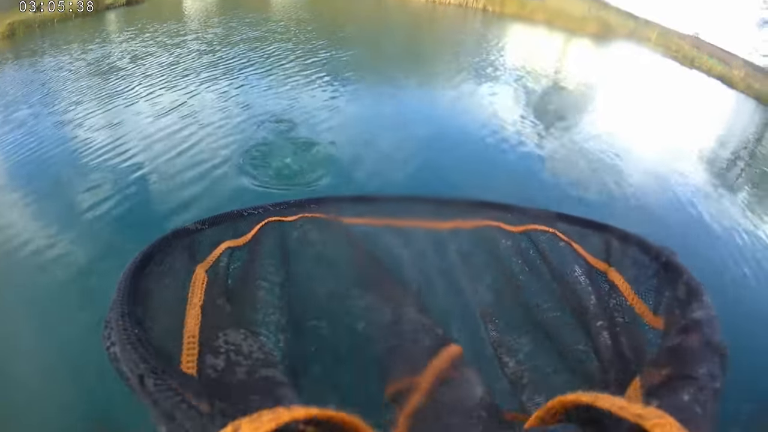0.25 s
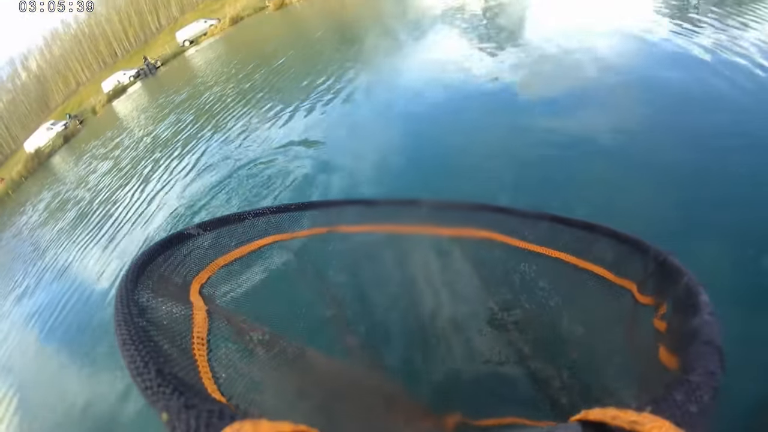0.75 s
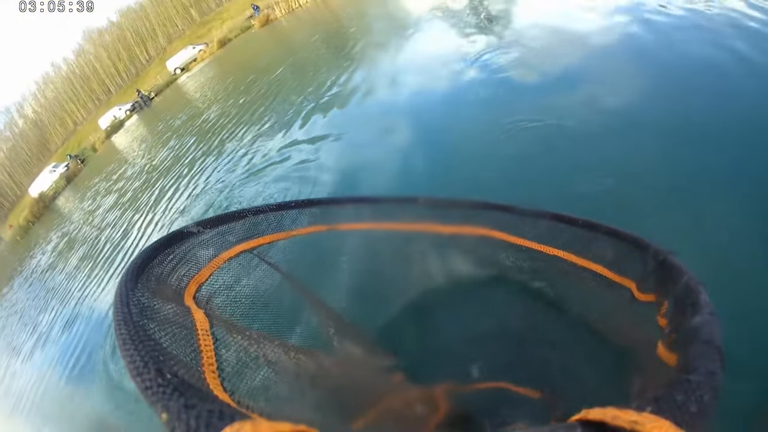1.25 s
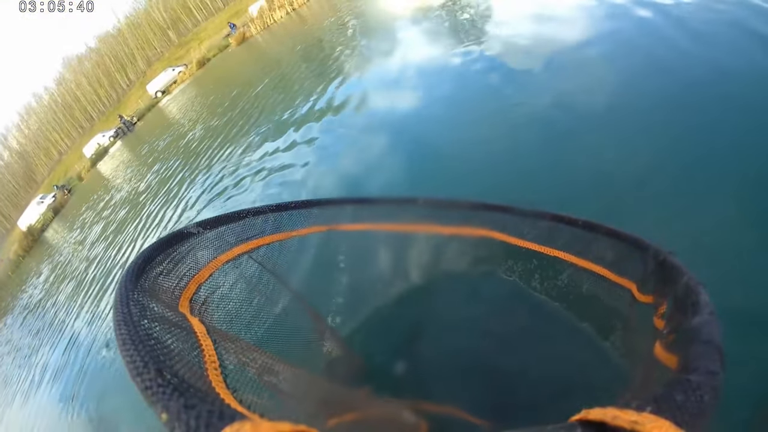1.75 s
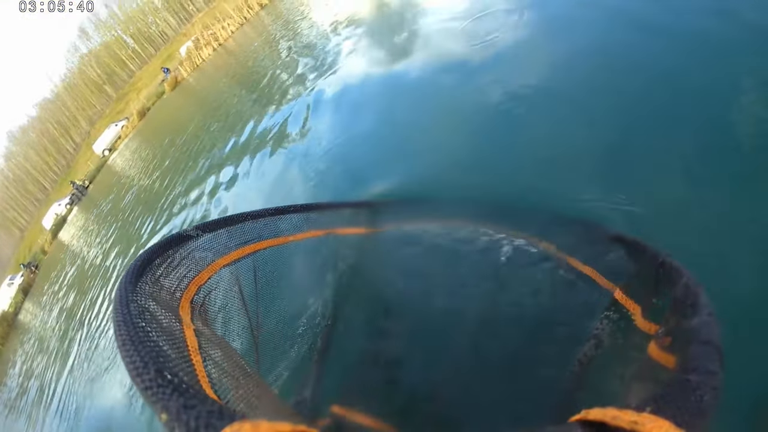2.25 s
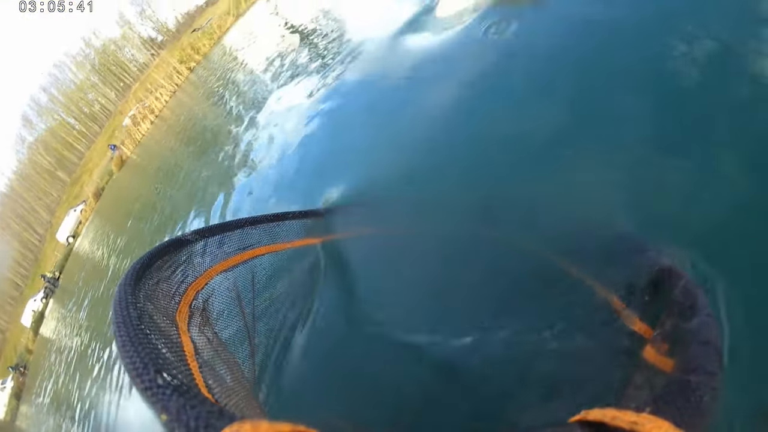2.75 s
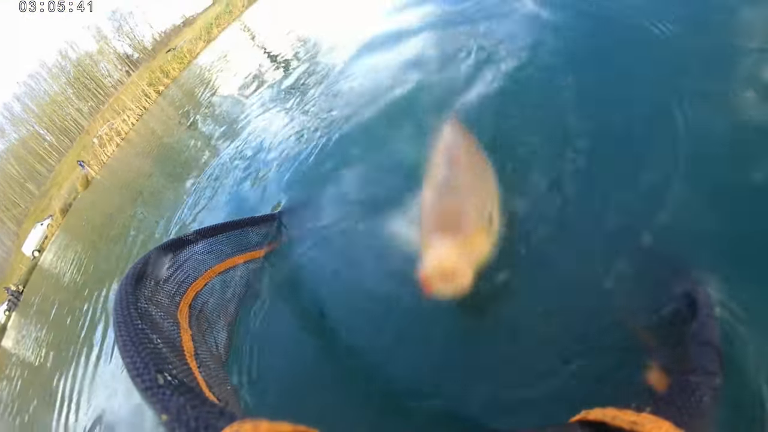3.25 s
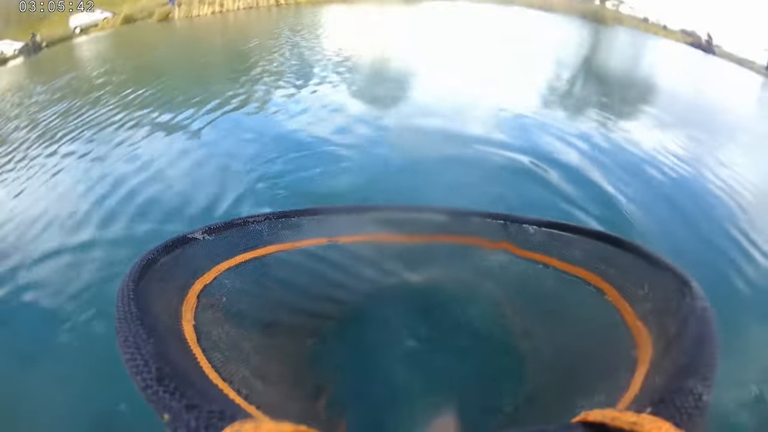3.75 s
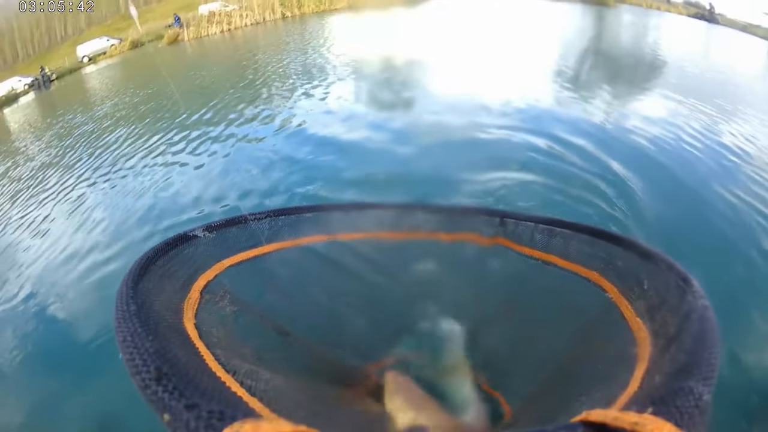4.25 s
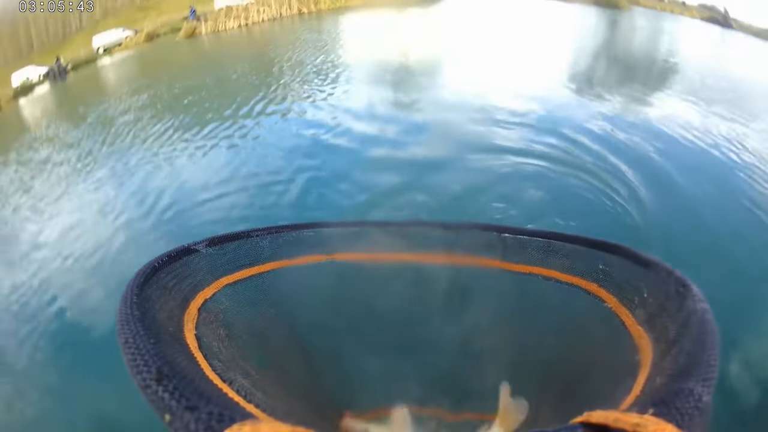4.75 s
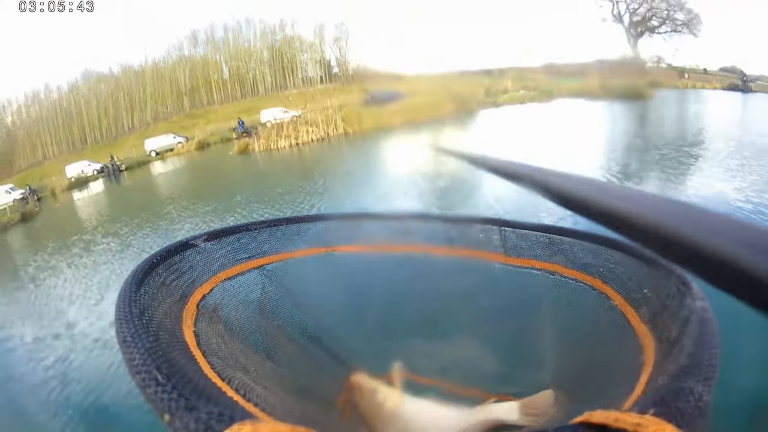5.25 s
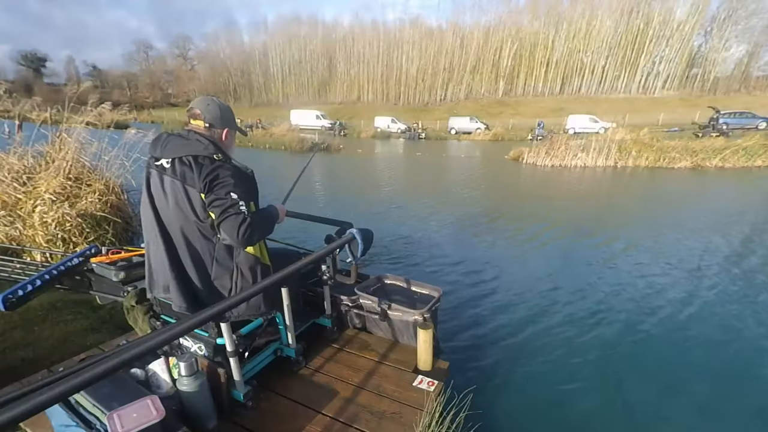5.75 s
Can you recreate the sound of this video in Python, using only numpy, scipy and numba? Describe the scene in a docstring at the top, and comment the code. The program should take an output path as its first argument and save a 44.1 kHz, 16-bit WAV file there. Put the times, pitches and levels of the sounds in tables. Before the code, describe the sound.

A landing-net pole hums and knocks amid gurgling water and wind rumble, heard on the left, before switching to stereo lakeside hiss.

```python
"""A landing-net pole hums as it bends, heard on the left only through the case of a camera strapped to it.
Mesh and hands scrape the pole, the loose frame knocks, and water and wind push on the case. Water
gurgles and drips, and the loudest moments overload the input. Near the end the sound switches to a
stereo camera on the bank: a soft fading ring, wind rumble, lakeside hiss and a few tackle clicks."""
import sys
import numpy as np
from scipy import signal
from scipy.fft import rfft, irfft
from scipy.io import wavfile
from scipy.ndimage import uniform_filter1d
from numba import njit

SR = 44100
rng = np.random.default_rng(int(sys.argv[2]) if len(sys.argv) > 2 else 0)


def unload_wav(signal):
    """Save mono or channel-first audio to the path in sys.argv[1] as 16-bit WAV at rate SR, clipped to [-1, 1]."""
    wavfile.write(
        sys.argv[1],
        SR,
        np.round(np.clip(np.atleast_2d(signal).T, -1, 1) * 32767).astype(np.int16),
    )


N = 264600
T = np.arange(N) / SR

# steady rubbing and sloshing: time_s, ring_db, wash_db, bright_db, gurgle_db
RUB_AND_SLOSH = [(0.0, -74, -57.5, -72.5, -70), (0.145, -64, -54.5, -66.5, -50),
                 (0.18, -30.5, -52, -75, -44.5), (0.29, -29, -63, -52, -28.5), (0.38, -35, -31, -50, -29),
                 (0.53, -16.5, -33, -42, -25.5), (0.59, -30, -53, -51.5, -34.5),
                 (0.66, -34.5, -72, -67, -36), (0.72, -45, -74, -70.5, -46), (0.75, -72, -74, -87, -79),
                 (0.79, -61.5, -60, -71.5, -63), (1.08, -50, -74.5, -73, -81),
                 (1.4, -69.5, -66, -68.5, -68), (1.61, -42, -73, -76.5, -57.5),
                 (1.75, -46, -55.5, -79.5, -60), (1.86, -58.5, -63, -77.5, -66),
                 (1.93, -88.5, -80.5, -93, -80), (2.11, -87.5, -85, -94.5, -101),
                 (2.16, -76, -71.5, -85.5, -89), (2.55, -84, -72, -87.5, -88),
                 (2.85, -77, -69.5, -83.5, -88), (3.1, -83, -72.5, -83.5, -88.5),
                 (3.5, -71.5, -65.5, -80, -96), (3.95, -75.5, -73, -95.5, -95),
                 (4.1, -62, -63, -66.5, -58.5), (4.23, -59, -52.5, -60.5, -52.5),
                 (4.45, -63, -44, -58.5, -39.5), (4.55, -64, -50, -67, -48.5), (4.73, -69, -46, -59, -41.5),
                 (4.85, -77, -50.5, -55, -47), (5.07, -46, -43, -52.5, -45.5), (5.16, -65, -62, -66, -60),
                 (5.3, -44.5, -43.5, -57.5, -47), (5.36, -53, -56, -76, -73), (5.49, -60, -49, -51, -49)]
# short scuffs and glugs: start_s, length_s, ring_db, gurgle_db
SCUFFS_AND_GLUGS = [(0.249, 0.025, -27.5, -56), (1.054, 0.022, -65, -53), (1.127, 0.033, -48, -52),
                    (3.109, 0.034, -76.5, -48.5), (3.174, 0.02, -59, -51.5), (3.488, 0.013, -71, -71),
                    (4.057, 0.018, -75, -49), (4.165, 0.031, -35, -31), (4.228, .06, -62, -42.5),
                    (4.385, 0.039, -50, -41), (4.456, 0.018, -55, -32), (4.529, 0.0063, -49, -42),
                    (4.554, 0.0087, -53, -57), (4.721, 0.02, -63, -51), (4.754, 0.036, -67, -35),
                    (4.972, 0.033, -60, -24), (5.093, 0.034, -29.5, -50), (5.214, 0.018, -22, -30),
                    (5.294, 0.025, -47, -37), (5.376, 0.034, -60, -45.5), (5.472, 0.016, -27.5, -45)]


def undb(db):
    """Turn decibels into a gain."""
    return 10 ** (np.asarray(db) / 20)


def unit(x):
    """Scale to an average (rms) level of 1."""
    return x / np.sqrt(np.mean(x ** 2))


def curves(table):
    """Join each column's points with straight lines in time."""
    time_s, *columns = np.transpose(table)
    return [np.interp(T, time_s, column) for column in columns]


def ring(x, hz, width_hz):
    """One resonance: keeps the sound near hz."""
    return signal.lfilter(*signal.iirpeak(hz, hz / width_hz, fs=SR), x)


def body(x, modes):
    """Add up several resonances, flipping every other one."""
    return sum((-1) ** k * undb(db) * ring(x, hz, width) for k, (hz, width, db) in enumerate(modes))


@njit
def moving_ring(x, hz, width_hz):
    """A resonance whose pitch can move every sample."""
    y, band, low = np.empty(len(x)), 0., 0.
    for i in range(len(x)):
        tuning, damping = np.tan(np.pi * hz[i] / SR), width_hz / hz[i]
        swing = (band + tuning * (x[i] - low)) / (1 + tuning * (tuning + damping))
        band, low = 2 * swing - band, low + 2 * tuning * swing
        y[i] = damping * swing
    return y


def muffle(x, hz):
    """Turn down the treble above hz."""
    return signal.sosfilt(signal.butter(3, hz, fs=SR, output="sos"), x)


def coloured(spectrum):
    """Noise of level 1, shaped by rows of pitch_hz, level_db."""
    hz, db = np.transpose(spectrum)
    log_hz = np.log(np.fft.rfftfreq(N, 1 / SR) + 1)
    gain = undb(np.interp(log_hz, np.log(hz), db, left=-90, right=-90))
    return unit(irfft(rfft(rng.standard_normal(N)) * gain, N))


def wander(per_s):
    """A smooth random wobble of size about 1."""
    hold = int(SR / per_s)
    steps = np.repeat(rng.standard_normal(N // hold + 1), hold)
    return unit(uniform_filter1d(uniform_filter1d(steps, hold), hold)[:N])


def burst(start_s, length_s, rise_s=0.0027):
    """A level that rises quickly, holds briefly and ends fast."""
    age = np.clip(T - start_s, 0, 1)
    return (1 - np.exp(-age / rise_s)) * np.exp(-(age / length_s) ** 2)


def pole_hum(tone_share=0.76, bump_s=.02):
    """The bending pole hums and shudders; soft bumps set it swinging briefly."""
    # the hum: time_s, pitch_hz, level_db
    bending = [(0.0, 57.24, -49), (0.14, 59.18, -45), (0.152, 62.74, -17), (0.3, 69.3, -26),
               (0.52, 80.1, -19.5), (0.61, 74.24, -29), (0.8, 46.47, -40.5), (1.23, 47.33, -34.5),
               (1.5, 45.92, -44), (1.71, 78.85, -32.5), (1.8, 79.86, -37), (1.92, 65.3, -55.5),
               (2.1, 62.4, -61.5), (2.5, 49.14, -50.5), (3.0, 44.47, -46), (3.6, 60, -46), (4.0, 46, -46),
               (4.12, 48, -24), (4.21, 60.1, -21), (4.44, 69.7, -23), (4.58, 59.51, -26), (4.75, 62, -28),
               (4.9, 49.03, -27.5), (5.19, 63.48, -24), (5.25, 62.6, -36.5), (5.29, 65.9, -26.5),
               (5.35, 68.7, -30), (5.5, 72.3, -39)]
    # soft bumps: middle_s, level_db, pitch_hz
    bumps = [(0.07, -28.5, 35), (2.191, -29, 55), (2.324, -30.5, 45), (2.42, -39, 50), (2.689, -31.5, 48),
             (3.14, -31.5, 53), (3.481, -32, 45), (3.8, -32.5, 60), (3.875, -28.5, 53), (3.98, -32, 40),
             (4.06, -20, 42), (4.521, -21.5, 50)]
    hz, db = curves(bending)
    phase = 2 * np.pi * np.cumsum(hz * (1 + 0.0498 * wander(25))) / SR
    octave = .12 * (hz / 70) ** 3.9 * np.sin(2 * phase)  # stronger as the pitch rises
    tone = undb(1.5 * wander(23)) * np.sqrt(2) * (np.sin(phase) + octave)
    shudder = coloured([(35, -11.5), (50, -8), (85, 2), (115, -29.5)])
    hum = undb(db + 2.5 * wander(12)) * (np.sqrt(tone_share) * tone + np.sqrt(1 - tone_share) * shudder)
    for middle_s, level_db, pitch_hz in bumps:
        swell = np.exp(-2 * ((T - middle_s) / bump_s) ** 2)
        hum += undb(level_db) * swell * np.sin(2 * np.pi * pitch_hz * (T - middle_s))
    return hum


def case_rumble():
    """Water and wind push on the case in gusts and single slow lurches."""
    # strength of the push: time_s, deep_db, upper_db
    pushes = [(0.0, -52, -56), (0.14, -38, -51), (0.155, -31, -21.5), (0.44, -65, -49), (0.64, -60, -34),
              (0.72, -32, -41.5), (0.82, -42.5, -54), (1.1, -43.5, -42.5), (1.35, -34, -60.5),
              (1.62, -50, -44), (1.82, -43.5, -43), (1.96, -47, -72.5), (2.95, -42, -68.5),
              (3.2, -42, -62.5), (4.0, -40.5, -63.5), (4.06, -29, -36.5), (4.25, -39.5, -33),
              (4.6, -26.5, -39.5), (4.9, -34.5, -36.5), (5.22, -27.5, -48.5), (5.5, -33.5, -40)]
    # lurches of pressure on the microphone: middle_s, length_s, signed_size
    lurches = [(0.722, 0.019, 0.13), (0.752, 0.05, -0.13), (0.785, 0.055, 0.1), (5.154, 0.033, 0.19),
               (5.167, 0.04, -0.083), (5.248, 0.061, -0.23), (5.278, .04, 0.0033)]
    deep_db, upper_db = curves(pushes)
    deep = coloured([(8, -14.5), (22, 1.5), (42, -3.5), (60, -21.5)])
    upper = coloured([(90, 4.5), (115, -0.5), (200, -7.0), (300, -18)])
    lurch = sum(size * np.exp(-.5 * ((T - s) / (0.3 * length)) ** 2) for s, length, size in lurches)
    return undb(deep_db + 3.0 * wander(12)) * deep + undb(upper_db + 2.9 * wander(30)) * upper + lurch


def scraped_pole(slips, rattle):
    """Tiny slips of mesh and hands make the pole and case ring, as do the frame's knocks."""
    # low resonances of pole and case: pitch_hz, width_hz, level_db
    low_modes = [(370, 35, -11), (522, 30, 0), (608, 25, -10), (750, 120, -17), (912, 30, -3),
                 (1135, 35, -8)]
    # high resonances: pitch_hz, width_hz, level_db
    high_modes = [(1817, 90, 7), (2170, 140, 3), (2460, 380, -0.5), (3235, 400, 2), (4760, 1200, -8)]
    ring_db, _, bright_db, _ = curves(RUB_AND_SLOSH)
    scuffs = sum(undb(db) * burst(s, length) for s, length, db, _ in SCUFFS_AND_GLUGS)
    low_rub = slips * (undb(ring_db) + scuffs)
    high_rub = rng.standard_normal(N) * undb(bright_db + 0.5 * wander(58) + 1.1 * wander(7.2))
    dull, bright, hard = frame_knocks(rattle)
    # dividing keeps plain noise at the same level through the resonances
    low = body(low_rub + dull, low_modes) / np.std(body(rattle[:SR], low_modes))
    high = body(high_rub + bright, high_modes) / np.std(body(rattle[:SR], high_modes))
    thud = 2.0 * ring(dull, 610, 900) + undb(14.5) * ring(dull, 170, 160)
    crack = ring(hard, 3000, 3100)
    return muffle(low + thud, 1240) + muffle(high, 4800) + crack


def sloshing_water(slips, hollow_hz=971.5):
    """Water makes a smooth wash and a hollow gurgle of wobbling pitch."""
    # tone of the wash: pitch_hz, level_db
    wash_tone = [(230, -9.5), (330, -5), (700, -6), (1300, -9.5), (1600, -19), (2500, -40.5)]
    _, wash_db, _, gurgle_db = curves(RUB_AND_SLOSH)
    glugs = sum(undb(db) * burst(s, length) for s, length, _, db in SCUFFS_AND_GLUGS)
    gurgle = unit(moving_ring(slips, hollow_hz * (1 + .045 * wander(30)), 105.))
    wash = undb(wash_db + 3.34 * wander(28)) * coloured(wash_tone)
    return wash + (undb(gurgle_db) + glugs) * muffle(gurgle, 1500)


def circuit_hiss(whine_hz=11160):
    """The net camera's electronics hiss and whine faintly."""
    hiss = undb(-89.5) * muffle(rng.standard_normal(N), 9500)
    return hiss + undb(-100) * np.sin(2 * np.pi * whine_hz * T)


def frame_knocks(rattle):
    """The loose frame strikes, chatters, then stops short."""
    # knocks: start_s, level_db, rattle_s, bright_share_db
    knocks = [(0.148, -25.5, 0.038, -11), (0.18, -18.5, 0.0036, -12), (0.187, -31.5, 0.0086, -35),
              (0.799, -52.5, 0.013, -16.5), (0.928, -43.5, 0.0063, -22.5), (0.975, -44, 0.0082, -29),
              (1.06, -50.5, 0.015, -22), (1.141, -42, 0.016, -25), (1.201, -50.5, 0.0075, -26),
              (1.555, -41, 0.01, -39), (1.632, -43.5, 0.016, -44), (1.679, -44, 0.011, -36),
              (2.186, -64.5, 0.016, -28), (3.107, -44, 0.0072, -16.5), (3.143, -56, 0.009, -29),
              (3.17, -59, 0.025, -5), (3.188, -40.5, 0.0042, -42), (3.49, -46, 0.011, -23),
              (3.513, -63.5, 0.014, -10), (4.016, -63, 0.0076, -6.5), (4.049, -41.5, 0.014, -26),
              (4.119, -41, 0.053, -38), (4.173, -11.5, 0.013, -8.5), (4.234, -34.5, 0.0073, -22),
              (4.264, -38, 0.013, -23), (4.384, -52, 0.015, -32), (4.463, -41, 0.0067, -24),
              (4.528, -39.5, 0.012, -28), (4.552, -57, 0.0097, -21), (4.754, -42.5, 0.012, -19),
              (4.972, -16, 0.012, -10), (4.987, -32, 0.011, 0.5), (5.1, -20, 0.015, -11.5),
              (5.117, -29.5, 0.012, -5.5), (5.172, -39, 0.014, -28), (5.201, -32.5, 0.0037, -8),
              (5.214, -25.5, 0.021, -19), (5.256, -37, 0.011, -11), (5.301, -35, 0.012, -7),
              (5.384, -44.5, 0.023, -15.5)]
    dull, bright, hard = np.zeros((3, N))
    for start_s, db, rattle_s, share_db in knocks:
        span = slice(int(start_s * SR), int((start_s + 3 * rattle_s) * SR))
        age = T[span] - start_s
        blow = rattle[span] * (np.exp(-(age / rattle_s) ** 2) + 0.59 * np.exp(-age / 0.00093))
        dull[span] += undb(db) * blow
        bright[span] += undb(db + share_db) * blow
        hard[span] += undb(1.3 * (db + share_db) + 9.0) * blow  # only heavy, bright blows crack
    return dull, bright, hard


def drips():
    """Each drip rings a bubble that rises in pitch as it closes; faint ones fall at random."""
    # drips and plops: start_s, level_db, pitch_hz, fade_s (time to fall 60 dB)
    drops = [(1.844, -43, 647, 0.062), (1.843, -43.5, 1420, 0.021), (1.859, -50, 705, 0.047),
             (1.884, -44.5, 960, 0.024), (1.948, -63.5, 820, .04), (1.949, -69.5, 1900, 0.064),
             (1.989, -53, 835, 0.042), (1.989, -52, 1520, 0.022), (2.538, -46, 1408, 0.048),
             (2.542, -53, 970, 0.038), (2.54, -74, 1720, 0.022), (2.51, -72, 3640, 0.013),
             (2.605, -72, 4000, .012), (2.645, -71, 2600, .015), (2.83, -63, 2530, 0.021),
             (3.107, -41, 1140, 0.026), (3.11, -50.5, 1657, 0.085), (3.188, -36, 1070, 0.032),
             (3.19, -49, 1670, 0.047), (3.495, -34, 647, 0.025), (5.475, -24, 410, 0.043)]
    strays = [(2.2 + 1.7 * when, -84 + 8.0 * loud, 1600 + 2200 * high, .012)
              for when, loud, high in rng.random((30, 3))]
    out = np.zeros(N)
    age = T[:SR // 5]
    for start_s, db, hz, fade_s in drops + strays:
        level = undb(db - 60 * age / fade_s) * (1 - np.exp(-age / 0.00049))
        start = int(start_s * SR)
        out[start:start + len(age)] += level * np.sin(2 * np.pi * hz * age * (1 + 2.1 * age))
    return out


def bank_wind():
    """Wind rumbles on the bank camera, the same on both sides."""
    # gusts: time_s, level_db
    gusts = [(5.5, -30.5), (5.572, -37.5), (5.666, -31), (5.704, -37), (5.938, -29.5), (6.0, -38)]
    # tone of the wind: pitch_hz, level_db
    wind_tone = [(12, -60), (20, -28), (27, -29), (30, -3), (43, -10.5), (96, 2), (236, -17), (400, -36.5),
                 (520, -40), (880, -120)]
    return undb(curves(gusts)[0] + 1.8 * wander(25)) * coloured(wind_tone)


def lakeside_hiss(level_db=-51.5):
    """A steady hiss that spreads left and right in the treble."""
    # tone of the hiss: pitch_hz, level_db
    hiss_tone = [(180, -19), (300, 1.5), (426, -3), (550, -6), (1160, -9.5), (1700, -12), (1870, -15),
                 (6920, -25.5), (11900, -31.5), (13500, -55)]
    middle = coloured(hiss_tone)
    side = signal.lfilter(*signal.butter(1, 5000, "high", fs=SR), coloured(hiss_tone))
    return undb(level_db) * (middle + 0.74 * side * np.array([[1], [-1]]))


def soft_ring_and_clicks():
    """A soft ring fades just after the switch, then tackle clicks; each is fading noise near a pitch."""
    # the ring (first two rows), then clicks: start_s, level_db, pitch_hz, fade_s (time to fall 60 dB)
    sounds = [(5.489, -27.5, 770, 0.52), (5.489, -33.5, 1380, 0.76), (5.665, -28.5, 3030, 0.038),
              (5.667, -32.5, 5200, 0.047), (5.665, -39, 8800, 0.045), (5.699, -33.5, 2110, .04),
              (5.765, -40, 4200, 0.022), (5.779, -31.5, 2100, 0.038), (5.786, -39, 3600, 0.02),
              (5.792, -33, 2480, .03), (5.855, -40, 4000, .03), (5.99, -36, 2280, .03)]
    out = np.zeros(N)
    for start_s, db, hz, fade_s in sounds:
        age = np.maximum(T - start_s, 0)
        noise = (T >= start_s) * undb(db - 60 * age / fade_s) * rng.standard_normal(N)
        out += ring(ring(noise, hz, 0.43 * hz), hz, 0.43 * hz)
    return out


def scene(net_gain_db=6.0, switch_s=5.489, slips_per_s=5000):
    """The net camera on the left, then a quick switch to the bank in stereo."""
    net = pole_hum() + case_rumble()
    # tiny random jolts drive both the gurgle and the scrape
    slips = rng.standard_normal(N) * (rng.random(N) < slips_per_s / SR)
    slips = unit(slips * undb(3.1 * rng.exponential(size=N))) * undb(1.9 * wander(52))
    rattle = rng.standard_normal(N)
    net += sloshing_water(slips) + scraped_pole(slips, rattle) + drips() + circuit_hiss()
    bank = bank_wind() + muffle(lakeside_hiss() + soft_ring_and_clicks(), 9170)
    switch = np.clip((T - switch_s) / 0.0039, 0, 1)
    left_only = np.array([[1], [0]])
    return undb(net_gain_db) * net * (1 - switch) * left_only + switch * bank


def record(dry, limit=.165, top_hz=16000):
    """The overloaded input flattens loud peaks; the highest treble is removed."""
    return signal.sosfilt(signal.ellip(8, .2, 70, top_hz, fs=SR, output="sos"), np.clip(dry, -limit, limit))


dry = scene()
out = record(dry)
unload_wav(out)
```